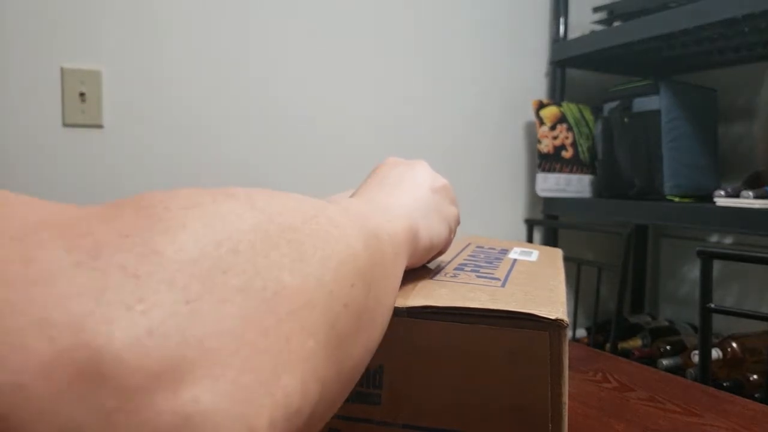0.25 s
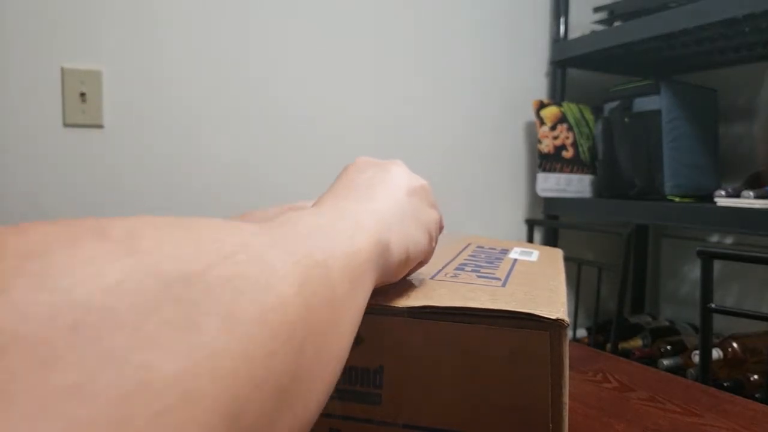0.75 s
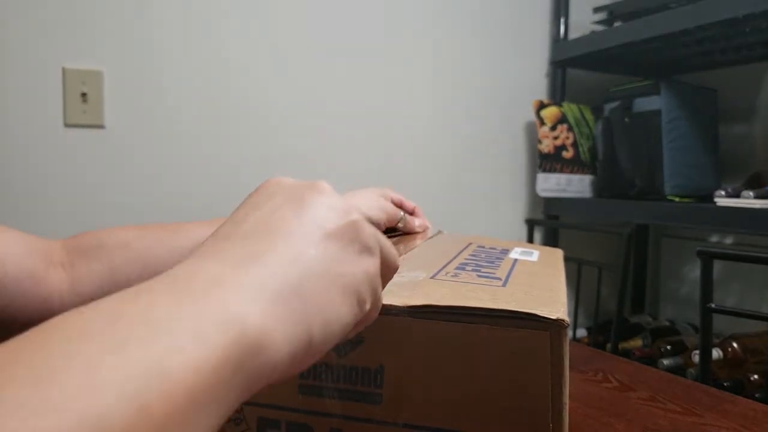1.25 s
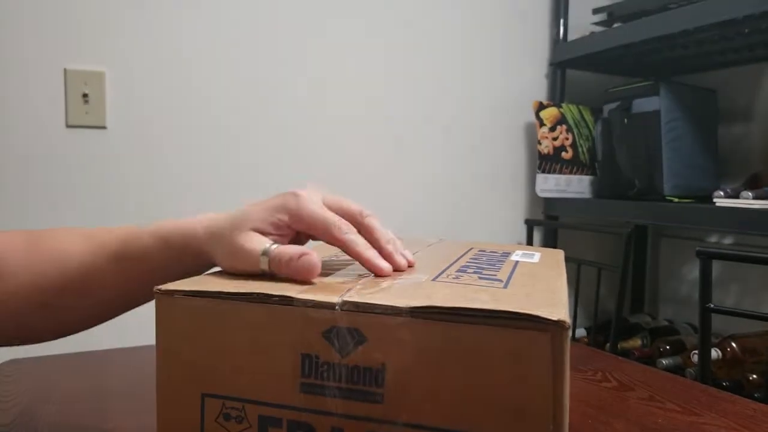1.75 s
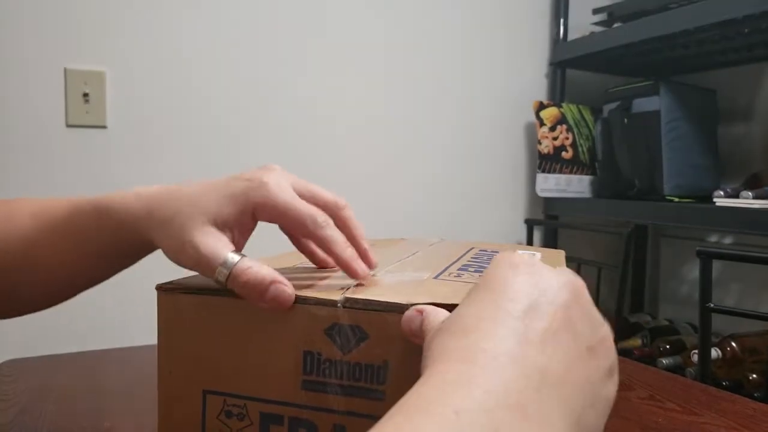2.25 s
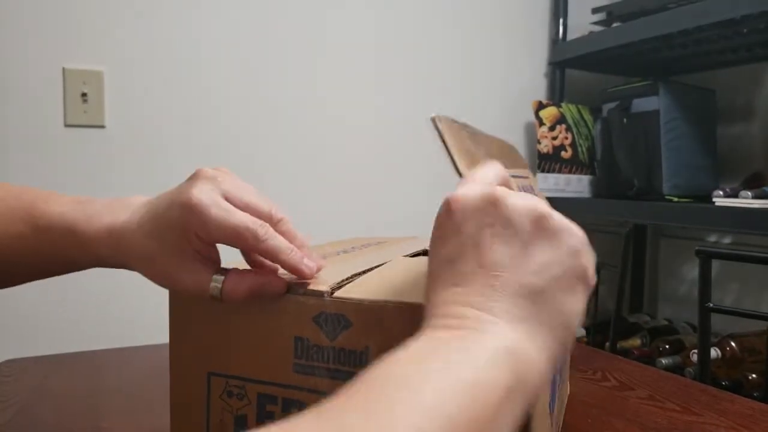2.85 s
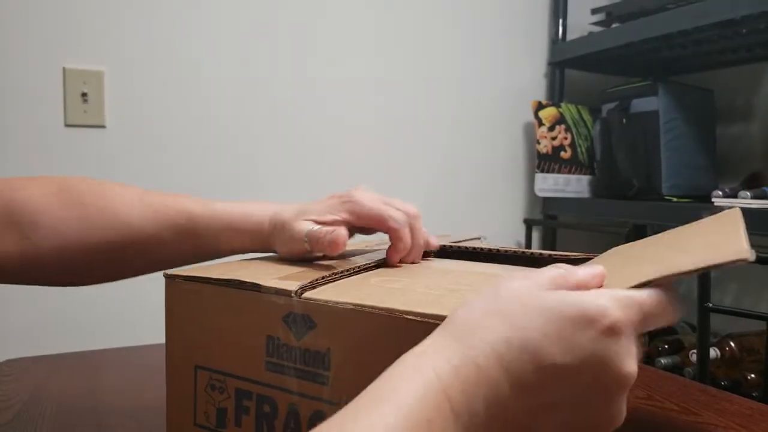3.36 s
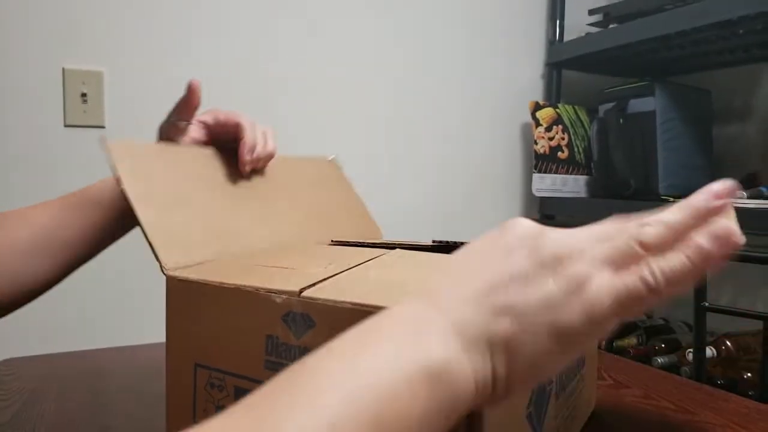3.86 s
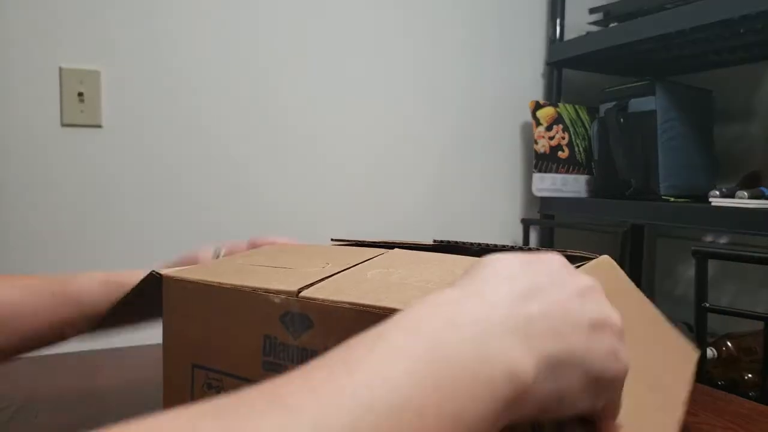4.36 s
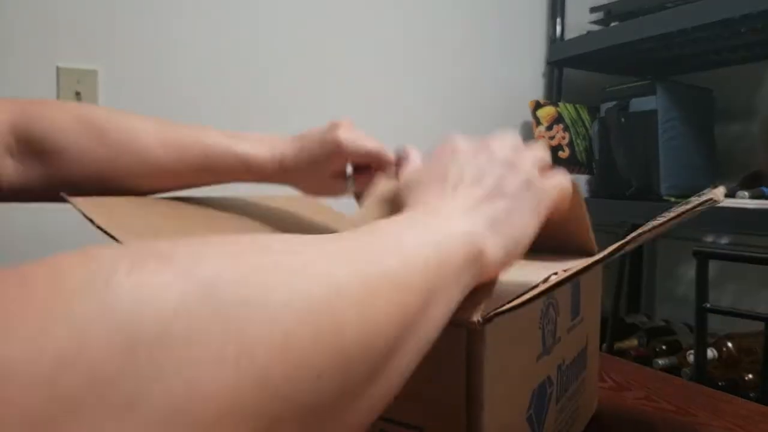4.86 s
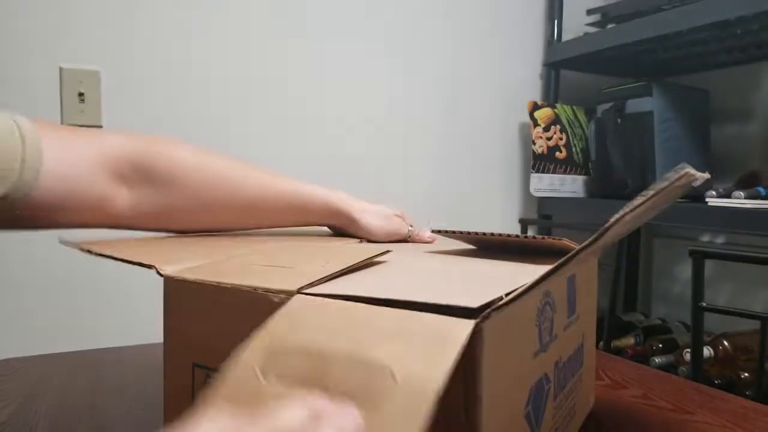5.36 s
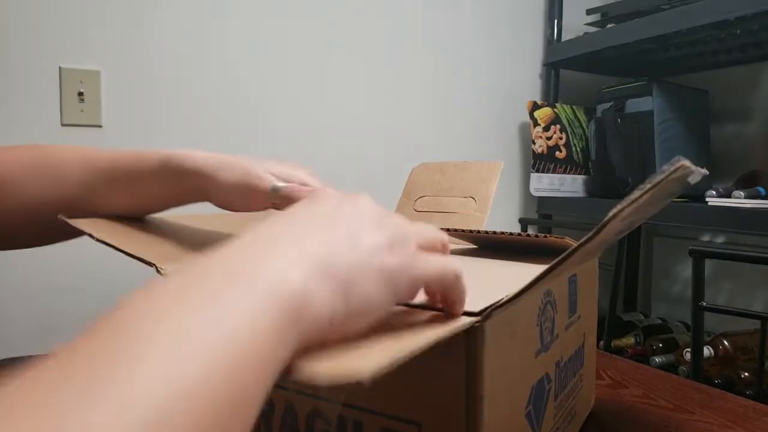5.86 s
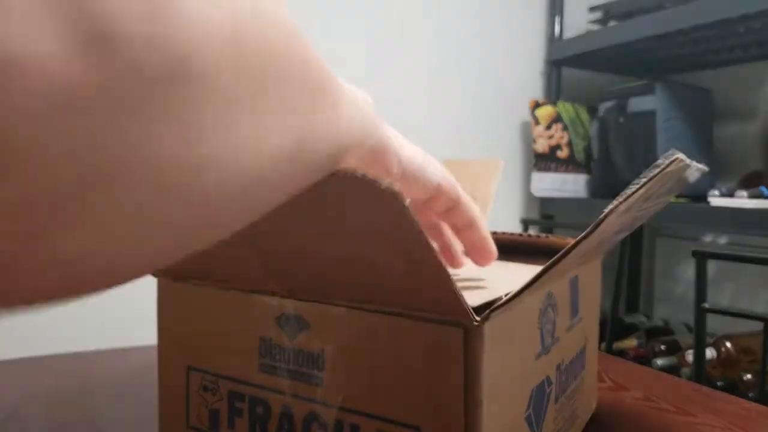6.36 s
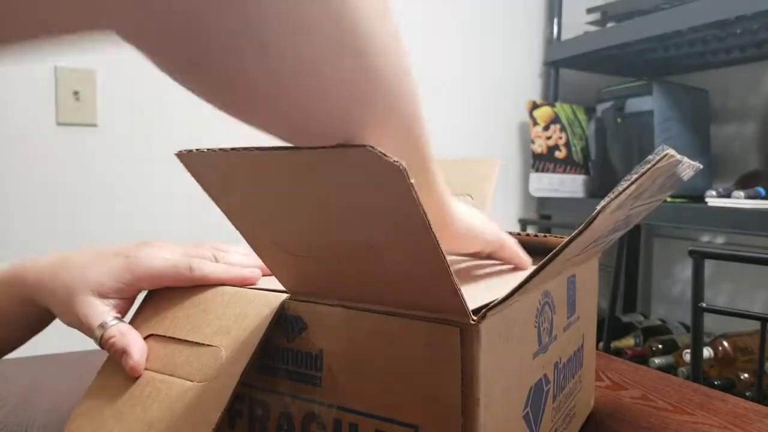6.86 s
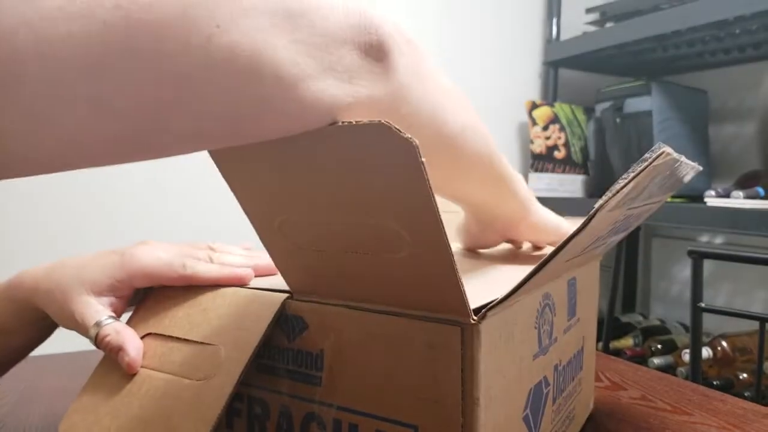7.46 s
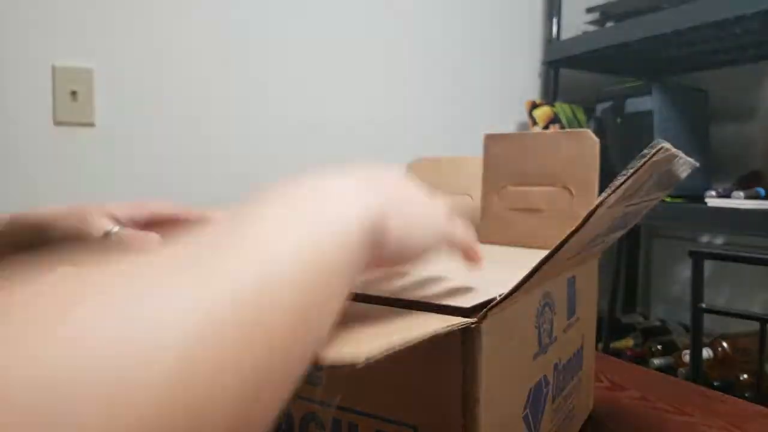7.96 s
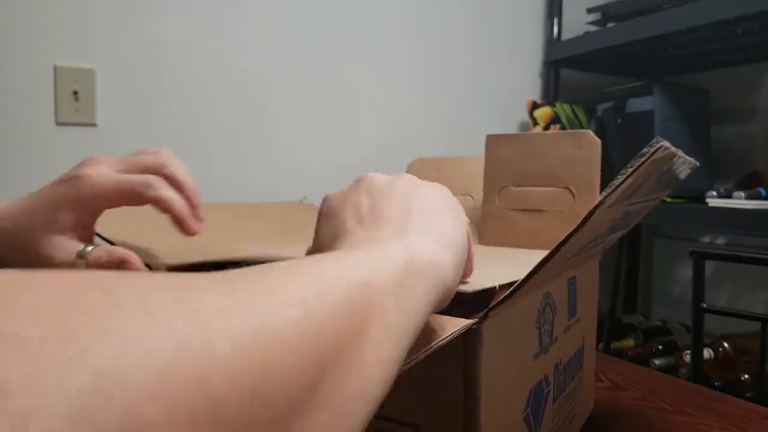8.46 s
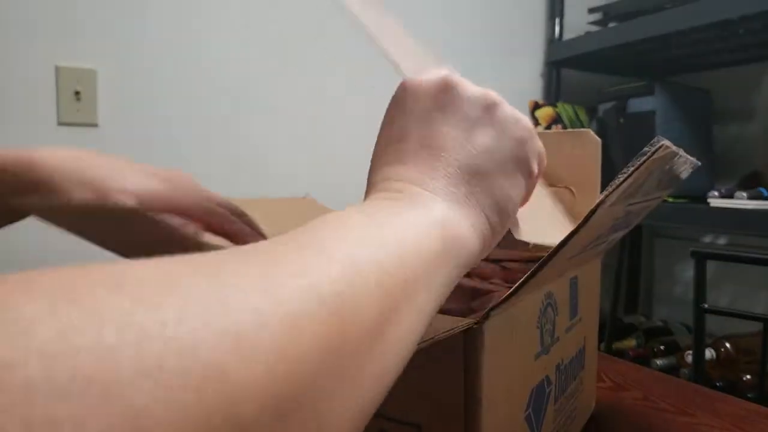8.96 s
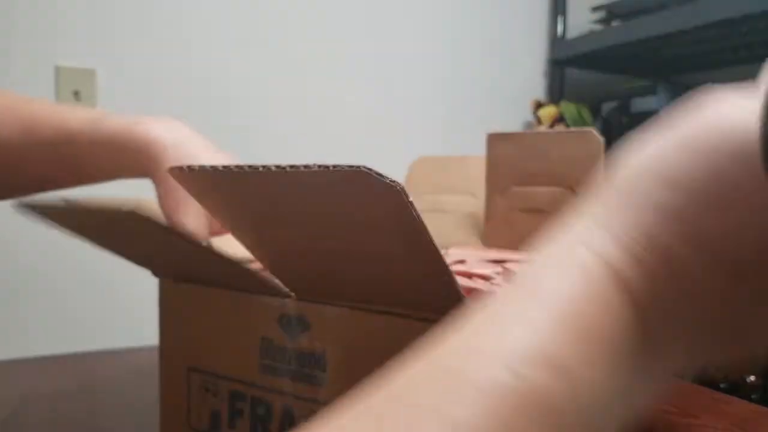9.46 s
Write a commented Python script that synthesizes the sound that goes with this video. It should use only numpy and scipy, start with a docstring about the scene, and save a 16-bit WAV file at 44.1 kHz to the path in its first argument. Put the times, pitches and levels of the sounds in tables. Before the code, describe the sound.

Close up in a small, quiet room with a low wavering hum, hands rub lightly over a cardboard box. A small metal blade drops on the table with a bright, brief, jingling ring. Two sharp pops follow as the last tape gives way and flaps come up, then fuller scraping, rustling, creaking flexes and dull hollow thumps continue to the end.

```python
"""Opening a cardboard box

A cardboard box is opened on a table in a small room, over a low wavering hum and filtered-noise room tone.
Hands, flaps and edges are swelling friction noise; scuffs and knocks ring flap, panel and box resonances.
After slitting the tape, a small steel blade is dropped on the table: ticks and ringing modes.
The last tape pops twice as the flaps are pulled up, in bursts of noise; then the handling carries on."""
import sys
import numpy as np
from scipy import signal
from scipy.fft import rfft, irfft, next_fast_len
from scipy.io import wavfile
from scipy.ndimage import uniform_filter1d

SR = 44100
rng = np.random.default_rng(int(sys.argv[2]) if len(sys.argv) > 2 else 0)


def wav_record(signal):
    """Record a signal, one row per channel, as 16-bit PCM in the file named by sys.argv[1]."""
    frames = np.transpose(np.atleast_2d(signal))
    bounded = np.clip(frames, -1, 1)
    # unit amplitude maps onto the largest positive 16-bit level
    quanta = np.round(bounded * 32767).astype(np.int16)
    wavfile.write(sys.argv[1], SR, quanta)


N = 427769


def amp(db):
    """Turns decibels into a gain factor."""
    return 10 ** (np.asarray(db) / 20)


def evened(x):
    """Scales to an rms of 1."""
    return x / np.sqrt(np.mean(x ** 2) + 1e-20)


def read(points, hz):
    """Reads a table on a log-frequency axis."""
    f, value = np.transpose(points)
    return np.interp(np.log(hz + 1), np.log(f + 1), value)


def add(mix, s, sound):
    """Mixes a stereo sound in at time s."""
    part = mix[:, max(round(s * SR), 0):][:, :sound.shape[1]]
    part += sound[:, :part.shape[1]]


def colour(x, spectrum, size=4096):
    """Causal (minimum-phase) filter with the given spectrum, so attacks stay sharp."""
    level_db = read(spectrum, abs(np.fft.fftfreq(size, 1 / SR)))
    log_gain = np.log(amp(np.maximum(level_db, -100)))
    kernel = np.fft.ifft(np.exp(np.conj(signal.hilbert(log_gain)))).real
    return signal.oaconvolve(x, kernel[None, :size // 2], axes=1)[:, :x.shape[1]]


# Stereo image of a diffuse sound: (frequency [Hz], left-right correlation [-1 to 1])
STEREO_LIKENESS = [(60, 0.94), (130, 0.95), (290, 0.88), (640, 0.69), (1410, 0.39), (3100, 0.086),
                   (6820, -0.0055), (15000, -0.048)]


def spread(pair):
    """Two unrelated signals become a diffuse field: alike in the bass, unrelated in the treble."""
    length = next_fast_len(pair.shape[1] + SR // 20)
    a, b = rfft(pair, length)
    same = np.clip(read(STEREO_LIKENESS, np.fft.rfftfreq(length, 1 / SR)), -1, 1)
    mid = a * np.sqrt((1 + same) / 2)
    side = b * np.sqrt((1 - same) / 2)
    return irfft(np.array([mid + side, mid - side]), length)[:, :pair.shape[1]]


def rumble(spectrum):
    """Smooth diffuse noise with the given spectrum."""
    length = next_fast_len(N)
    z = rfft(spread(rng.standard_normal((2, length))))
    gain = amp(read(spectrum, np.fft.rfftfreq(length, 1 / SR)))
    return evened(irfft(z * gain, length)[:, :N])


def friction(spectrum, slips_per_s, size_db, smooth, patchy_db, judder_db):
    """Makes tiny slips of uneven size over a smooth hiss; the contact judders and its colour shifts."""
    length = next_fast_len(N)
    slipping = rng.random(length) < slips_per_s / SR
    slips = amp(size_db * np.minimum(rng.exponential(1, length), 4)) * slipping
    judder = amp(judder_db * evened(uniform_filter1d(rng.standard_normal(length), size=260)))
    grain = np.sqrt(evened(slips) ** 2 + smooth ** 2) * judder
    pair = rng.standard_normal((2, length)) * grain
    _, _, z = signal.stft(spread(pair), SR, nperseg=1024)
    # blurring over frequency, then time, makes patches that brighten and dull
    patches = uniform_filter1d(rng.standard_normal(z.shape[1:]), size=7, axis=0)
    patches = evened(uniform_filter1d(patches, size=8, axis=1))
    moving = signal.istft(z * amp(patchy_db * patches), SR, nperseg=1024)[1][:, :N]
    return evened(colour(moving, spectrum))


def swells(gestures, shape):
    """Each gesture speeds up, peaks and slows down; gives the summed power of its two sounds."""
    t = np.arange(0, N / SR + .002, .001)
    power = np.zeros((2, len(t)))
    for s, rise, fall, *db in gestures:
        away = abs(t - s) / np.maximum(np.where(t < s, rise, fall), .005)
        power += (amp(db)[:, None] * np.exp(-away ** shape)) ** 2
    return [np.interp(np.arange(N) / SR, t, p) for p in power]


# The room's own noise: (frequency [Hz], relative level [dB])
ROOM_NOISE = [(13, -43.5), (22, 0.5), (128, 4), (229, -5), (672, -18.5), (1100, -30), (2080, -33.5),
              (3510, -30.5), (4380, -90), (7810, -60), (8970, -36.5), (12500, -29.5), (16000, -27.5)]
HUM_HZ = 125.3


def hum(waver_hz=1.1, throb=0.14, hum_db=-59.5, noise_db=-55.5):
    """A sine drifting in pitch and level hums over the room's own steady noise."""
    t, knots = np.arange(N) / SR, np.arange(0, 10, .125)
    drift = np.interp(t, knots, rng.standard_normal(len(knots)))
    swell = np.interp(t, knots, rng.standard_normal(len(knots)))
    tone = np.sqrt(2) * np.sin(2 * np.pi * np.cumsum(HUM_HZ + waver_hz * drift) / SR)
    return amp(hum_db) * tone * (1 + throb * swell) + amp(noise_db) * rumble(ROOM_NOISE)


# Skin sliding on board: (frequency [Hz], relative level [dB])
SKIN_SPECTRUM = [(2060, -16), (3500, -10), (4740, -13.5), (5800, -12), (7950, -13.5), (9130, -5),
                 (12300, -1.5), (15100, -2.5), (15800, -6)]
# Edges rasping: (frequency [Hz], relative level [dB])
EDGE_SPECTRUM = [(350, -21), (600, -3), (737, -12), (851, -9.5), (1080, -9.5), (1280, -7), (1880, -13.5),
                 (2040, -11), (2890, -11.5), (3480, -10.5), (4320, -18.5), (6250, -18), (7000, -18.5),
                 (9100, -55.5), (15400, -120)]
# Panels flexing: (frequency [Hz], relative level [dB])
FLEX_SPECTRUM = [(110, -36.5), (190, 1), (371, -2), (440, -2), (479, -9), (556, -12), (605, -12),
                 (740, -17.5), (900, -19.5), (1170, -45), (1980, -120)]
# The whole box swaying: (frequency [Hz], relative level [dB])
SWAY_SPECTRUM = [(13, -47.5), (22, -23), (54, 2.5), (92, -5), (110, -4), (124, 7.5), (156, -1),
                 (240, -11.5), (310, -21.5), (530, -120)]
# Strokes of a hand or flap over the board; swells() takes rise and fall as 5 ms or more:
# (fastest moment [s], speeding up [s], slowing down [s], skin hiss level [dB], edge rasp level [dB])
STROKES = [(0.065, 0.09, 0.052, -62, -76), (0.30, .16, .06, -56.5, -69), (0.338, 0.029, 0.039, -58, -63.5),
           (0.44, .012, 0.027, -60, -76), (0.614, 0.024, .11, -53, -63.5), (0.796, .085, .075, -60, -63.5),
           (0.93, 0.2, 0.038, -56, -72), (1.1, 0.1, 0.16, -67.5, -82), (1.278, 0.022, 0.038, -50, -58.5),
           (1.349, .041, 0.047, -51.5, -53.5), (1.507, .018, 0.033, -52, -57.5),
           (1.569, .023, 0.04, -42.5, -82), (1.72, 0.0043, .3, -55.5, -64), (2.137, .02, .03, -55, -70),
           (2.265, 0.027, .036, -51.5, -87), (2.337, .024, .09, -55.5, -80),
           (2.634, 0.074, 0.39, -54.5, -74), (2.922, 0.042, 0.084, -48.5, -64),
           (3.037, 0.015, 0.063, -58.5, -60), (3.195, 0.012, 0.36, -52, -67.5),
           (3.453, 0.043, .045, -43.5, -59), (3.515, 0.06, 0.064, -55, -53.5),
           (3.76, 0.14, 0.11, -57.5, -62.5), (3.966, 0.04, 0.066, -42, -61),
           (4.174, 0.036, 0.047, -51.5, -65), (4.296, 0.15, 0.045, -53.5, -58.5),
           (4.453, 0.019, 0.11, -58, -54.5), (4.621, 0.22, 0.14, -45, -60), (4.878, 0.062, 0.036, -48, -50),
           (4.962, 0.051, 0.11, -46.5, -54.5), (5.297, 0.2, .092, -48.5, -61.5),
           (5.392, 0.033, 0.085, -43, -67), (5.495, 0.027, .04, -43, -56),
           (5.769, 0.11, 0.52, -41.5, -52.5), (6.028, 0.047, 0.04, -37, -44.5),
           (6.185, 0.039, .07, -62, -64), (6.478, 0.11, .1, -42.5, -50), (6.702, .085, 0.041, -48, -55.5),
           (6.987, 0.25, .075, -43.5, -56.5), (7.296, 0.26, 0.15, -51, -61),
           (7.723, 0.067, 0.3, -49, -58.5), (7.966, 0.26, 0.37, -46, -56), (8.282, 0.029, 0.12, -46.5, -49),
           (8.581, 0.075, 0.11, -55, -51.5), (8.83, 0.13, 0.11, -56.5, -55.5),
           (8.993, 0.035, 0.064, -54, -51), (9.199, .022, 0.032, -51.5, -60),
           (9.343, 0.15, 0.045, -48.5, -52), (9.463, 0.073, 0.014, -47, -49.5),
           (9.613, .11, 0.096, -43.5, -45)]
# Shoves that shift the box:
# (hardest moment [s], building up [s], letting go [s], panel flex level [dB], box sway level [dB])
SHOVES = [(0.28, .25, .21, -60.5, -52), (0.635, .06, .07, -49.5, -49), (0.79, 0.097, 0.18, -50, -48),
          (1.34, 0.14, 0.23, -53, -47), (1.728, 0.01, 0.037, -46, -36.5), (1.81, 0.039, 0.054, -44.5, -54),
          (2.026, 0.021, 0.045, -56.5, -44.5), (2.18, .04, 0.092, -53, -61), (2.87, 0.15, .19, -54, -47),
          (3.187, 0.024, 0.13, -57, -52), (3.49, 0.092, 0.37, -54, -56), (3.988, .048, .055, -55, -45.5),
          (4.52, 0.094, 0.52, -57, -49), (4.833, 0.037, .055, -56, -43), (4.973, .026, 0.088, -57, -45),
          (5.386, .023, .06, -54, -46.5), (5.85, 0.058, 0.071, -53, -46.5),
          (6.03, 0.084, 0.081, -41.5, -41), (6.29, 0.062, 0.12, -46, -37.5),
          (6.465, 0.052, .14, -47.5, -43), (6.725, 0.064, 0.18, -55, -47.5),
          (7.2, 0.27, 0.29, -54.5, -46.5), (7.552, 0.046, 0.089, -60, -44.5),
          (7.665, .026, 0.23, -57, -41.5), (8.169, 0.11, 0.082, -49, -45), (8.32, 0.093, .15, -44.5, -40.5),
          (8.55, 0.09, .11, -49, -49), (8.793, .018, .08, -43.5, -48), (8.982, .1, 0.11, -63, -44.5),
          (9.127, .029, 0.14, -50.5, -46), (9.413, 0.044, 0.094, -50.5, -50.5),
          (9.69, 0.058, .06, -42.5, -38)]
STROKE_SHAPE, SHOVE_SHAPE = 1.6, 1.7  # 1 = a pointed swell, 2 = a rounded one
HOLD_HISS_DB, HOLD_FLEX_DB, HOLD_SWAY_DB = -68, -68.5, -61  # hands merely holding the box
DRAG_FLEX_DB, DRAG_SWAY_DB = -7.0, -7.5  # panels and box dragged along, relative to the edge rasp


def handling():
    """Skin hisses evenly, edges rasp coarsely, and shoved or dragged panels flex and sway."""
    slide, rasp = swells(STROKES, STROKE_SHAPE)
    flex, sway = swells(SHOVES, SHOVE_SHAPE)
    slide = slide + amp(HOLD_HISS_DB) ** 2
    flex = flex + amp(DRAG_FLEX_DB) ** 2 * rasp + amp(HOLD_FLEX_DB) ** 2
    sway = sway + amp(DRAG_SWAY_DB) ** 2 * rasp + amp(HOLD_SWAY_DB) ** 2
    skin = friction(SKIN_SPECTRUM, slips_per_s=5000, size_db=2.8, smooth=1.1, patchy_db=.8, judder_db=.6)
    edges = friction(EDGE_SPECTRUM, slips_per_s=1400, size_db=3.0, smooth=.8, patchy_db=3.0, judder_db=1.4)
    panels = friction(FLEX_SPECTRUM, slips_per_s=270, size_db=1.0, smooth=0.73, patchy_db=5.0, judder_db=1.0)
    rubbing = np.sqrt(slide) * skin + np.sqrt(rasp) * edges
    shifting = np.sqrt(flex) * panels + np.sqrt(sway) * rumble(SWAY_SPECTRUM)
    return rubbing + shifting


# Fibres giving way, for the crackles and the snaps: (frequency [Hz], relative level [dB])
CRACK_SPECTRUM = [(260, -16), (450, -3.5), (818, -18), (1050, -16), (2290, -16), (2660, -18.5),
                  (3590, -15.5), (5710, -24), (7930, -22.5), (9070, -16), (9770, -21), (12600, -19),
                  (16000, -26)]


def crackles(level_db, per_s=22, size_db=7.0, crack_s=0.0012):
    """Now and then a rasping edge snags a fibre, which gives way with a tiny crack."""
    _, rasp = swells(STROKES, STROKE_SHAPE)
    snagging = rng.random(N) < per_s / SR
    snags = amp(size_db * np.minimum(rng.exponential(1, N), 3)) * snagging
    t = np.arange(SR // 50) / SR
    fading = signal.oaconvolve(snags, np.exp(-t / crack_s))[:N]
    cracks = colour(spread(rng.standard_normal((2, N)) * fading), CRACK_SPECTRUM)
    return amp(level_db) * np.sqrt(rasp) * evened(cracks)


# Blows on the box: (time [s], level [dB], pitch of the struck panel [Hz])
KNOCKS = [(0.19, -38.5, 127), (0.33, -40, 346), (0.783, -34.5, 333), (1.264, -38, 140), (1.28, -30, 318),
          (1.356, -33.5, 114), (1.462, -39, 117), (1.714, -36, 94), (2.338, -39, 135), (2.76, -17, 132),
          (2.7845, -16, 394), (3.5915, -7, 348), (3.598, -28, 118), (3.981, -37, 141), (4.271, -40, 332),
          (4.642, -36.5, 110), (4.833, -41.5, 323), (4.945, -32.5, 201), (5.374, -34.5, 170),
          (5.931, -31, 210), (6.004, -30, 295), (6.246, -28, 130), (6.273, -37, 130), (6.321, -26, 232),
          (6.442, -25.5, 91), (6.617, -34, 123), (6.954, -32.5, 131), (7.171, -32, 125),
          (7.186, -28.5, 127), (7.224, -33.5, 312), (8.327, -27.5, 144), (8.43, -31, 129),
          (8.976, -25.5, 172), (9.182, -33, 178), (9.593, -34.5, 174), (9.664, -33.5, 296)]
# Modes of the hollow box: (frequency [Hz], relative level [dB], decay by 60 dB [s])
BOX_MODES = [(122.9, -15, 0.33), (176, -45, 0.22), (240, -20, 0.087), (333, -35.5, 0.13), (364, -36, 0.14),
             (415, -23, 0.27), (535, -54.5, .14), (605, -18.5, 0.094), (665, -26.5, .14), (863, -36, 0.14),
             (980, -26.5, 0.11), (1430, -22.5, 0.08)]


def knocks(swing_s=0.0029, swing_cycles=0.2, wall_s=0.0103, wall_db=-12.0):
    """A struck panel swings briefly and sets the hollow box ringing; the near wall answers."""
    out, t = np.zeros((2, N)), np.arange(SR // 3) / SR
    for s, db, hz in KNOCKS:
        u = t / (swing_s / 2 + swing_cycles / hz)
        panel = -u * np.exp(1 - u) * np.sin(2 * np.pi * hz * t)
        ring = np.zeros(len(t))
        for f, level, t60 in BOX_MODES:
            reach = 1 / (1 + (f / (3 * hz)) ** 4)  # a slow blow hardly reaches the higher modes
            ring -= amp(level - 60 * t / t60) * np.sin(2 * np.pi * f * t) * reach
        blow = amp(db) * np.tile(panel + ring * (1 - np.exp(-u)), (2, 1))
        add(out, s, blow)
        add(out, s + wall_s, amp(wall_db) * blow)
    return out


# Tape and board snapping; the level is before the snaps' common trim, and a length over 20 ms plays as 20 ms:
# (time [s], peak level [dB], treble boost or cut [dB], length [s])
SNAPS = [(0.584, -46, 33, 0.0014), (1.273, -46, 14, 0.0087), (1.322, -41.5, 2, 0.0076),
         (1.344, -45, -2, 0.0063), (1.392, -42.5, -3, 0.0026), (2.135, -47, 17.5, 0.0061),
         (2.63, -51, 8, 0.018), (2.737, -43.5, 11, .024), (2.758, -23.5, -2, 0.0033),
         (2.763, -33, -11, .017), (2.779, -34, 8, 0.025), (3.118, -47.5, -3, 0.0044),
         (3.567, -52, -10, 0.0081), (3.5904, -18.5, 4, 0.0018), (3.6, -32, -15, 0.0032),
         (4.833, -39.5, -16, 0.0063), (4.844, -34, 8.5, 0.013), (4.855, -39, 16, .012),
         (4.946, -34, 4.5, 0.0094), (5.375, -40.5, 10, .0063), (6.034, -36.5, 10, 0.021),
         (6.318, -40.5, -4, 0.0097), (6.321, -28.5, 5, 0.0019), (6.329, -36.5, -3, 0.0068),
         (6.437, -36, 2, 0.0055), (6.634, -40, 7, 0.0016), (6.769, -27, 14.5, 0.0028),
         (7.21, -49, -11, .011), (7.221, -39, -3, 0.0086), (7.234, -45, 3, 0.0083),
         (7.722, -50.5, 2, 0.0044), (8.329, -46.5, -5, 0.01), (8.508, -45, 14, .003),
         (8.831, -43, -4, 0.0056), (8.963, -50, -6, .0044), (9.62, -35, -36, .011), (9.675, -48, 9, .012)]


def snaps(trim_db=2.5, tail_db=-38.0, tail_s=0.02, grain_db=4.5):
    """Each snap is a burst of fibres giving way, with a faint buzz of the board after it."""
    out, t = np.zeros((2, N)), np.arange(SR // 8) / SR
    crisp_band = signal.butter(2, 800, "high", fs=SR, output="sos")
    for s, db, bright_db, length in SNAPS:
        fibres = amp(grain_db * evened(uniform_filter1d(rng.standard_normal(len(t)), size=25)))
        fading = np.exp(-t / np.clip(length, .0005, .02)) + amp(tail_db) * np.exp(-t / tail_s)
        burst = spread(rng.standard_normal((2, len(t))) * fibres * fading)
        # the treble tilt sets in at 3 kHz and is complete two octaves up
        tilted = [(hz, level + bright_db * np.clip(np.log2(hz / 3000) / 2, 0, 1))
                  for hz, level in CRACK_SPECTRUM]
        snap = colour(burst, tilted)
        # levelled by its loudest 2 ms above 800 Hz
        crisp = signal.sosfilt(crisp_band, snap)
        loudest = np.sqrt(uniform_filter1d((crisp ** 2).mean(0), size=88).max())
        add(out, s, amp(db + trim_db) * snap / loudest)
    return out


# An edge catching and chattering; the level is before the scuffs' common trim:
# (middle [s], level [dB], resonance [Hz], length [s])
SCUFFS = [(0.796, -63, 1520, 0.13), (1.399, -55.5, 1470, 0.031), (1.763, -55.5, 2420, 0.047),
          (4.462, -51, 683, 0.06), (4.469, -59, 1890, 0.063), (4.543, -58, 1280, 0.15),
          (4.576, -53.5, 600, 0.06), (5.274, -61.5, 1270, 0.044), (5.759, -55, 670, 0.094),
          (6.02, -48, 1320, 0.1), (6.021, -38.5, 432, 0.068), (6.929, -62, 1390, 0.42),
          (7.099, -54.5, 1260, 0.024), (7.22, -53, 1370, 0.041), (7.955, -62, 1290, 0.23),
          (8.341, -58, 1300, 0.028), (8.808, -58, 590, 0.051), (9.332, -49.5, 500, 0.039),
          (9.617, -47.5, 1440, .03), (9.673, -40.5, 480, 0.037)]


def scuffs(trim_db=-3.5, width=0.11, slips_per_s=400):
    """A quick run of slips rings one resonance of a flap."""
    out, t = np.zeros((2, N)), np.arange(SR // 40) / SR
    for s, db, hz, length in SCUFFS:
        count = int(SR * length)
        slips = (rng.random(count) < slips_per_s / SR) + 0.04 * rng.standard_normal((2, count))
        ring = np.exp(-np.pi * width * hz * t) * np.sin(2 * np.pi * hz * t)
        chatter = signal.oaconvolve(np.diff(slips) * np.hanning(count - 1), ring[None], axes=1)
        add(out, s - length / 2, amp(db + trim_db) * evened(chatter))
    return out


# The blade touching the table: (time [s], ring level [dB], tick level [dB])
CLATTER = [(1.715, -57, -63), (1.7503, -42, -41.5), (1.797, -27.5, -28.5), (1.8105, -14, -31),
           (1.815, -13.5, -24), (1.826, -18.5, -36.5), (1.84, -12.5, -37.5), (1.848, -20.5, -43),
           (1.855, -23, -33.5), (1.866, -20.5, -40), (1.887, -42.5, -38.5), (1.9, -15, -38.5),
           (1.908, -21.5, -35), (1.917, -32, -40.5), (1.978, -33, -58), (2.011, -41, -49), (2.04, -41, -53)]
# The blade's modes: (frequency [Hz], relative level [dB])
BLADE_MODES = [(2560, -34.5), (3310, -33), (3720, -34.5), (5080, -41.5), (5930, -41.5), (6788, -33),
               (8856, -16.5), (9945, -9.5), (10663, -24), (10819, 0), (11007, -22.5), (11563, -16),
               (11622, -10), (11656, -6), (14339, -4), (14681, -8.5), (15581, -8)]
# The tick of steel on the table: (frequency [Hz], relative level [dB])
TICK_SPECTRUM = [(500, -1), (1700, -3), (2500, 1.5), (3400, 5.5), (4400, -2.5), (5300, 0), (6800, -0.5),
                 (8000, -24.5), (11000, -2), (16000, -18.5)]
BLADE_DAMPED_S = 1.908  # from here the ringing is quickly damped, though a few faint touches follow


def blade(ring_s=0.24, tick_s=.0035, damping_s=.008):
    """Every touch on the table ticks and rings the steel's modes in a new mix; late on, the ring is damped."""
    out, t = np.zeros((2, N)), np.arange(SR // 4) / SR
    hz, mode_db = np.transpose(BLADE_MODES)
    waves = np.exp(2j * np.pi * hz[:, None] * t)
    for s, ring_db, tick_db in CLATTER:
        share = amp(mode_db) * np.sqrt(rng.exponential(1, (2, len(hz))) + .3)
        share = share / np.linalg.norm(share, axis=1, keepdims=True)
        share = share * np.exp(2j * np.pi * rng.random(share.shape))  # random phases
        time_damped = np.maximum(t - max(BLADE_DAMPED_S - s, 0), 0)
        ring = (share @ waves).real * amp(-60 * t / ring_s) * np.exp(-time_damped / damping_s)
        tick = evened(colour(rng.standard_normal((2, len(t))), TICK_SPECTRUM)) * np.exp(-t / tick_s)
        add(out, s, amp(ring_db) * ring + amp(tick_db) * tick)
    return out


# The small room's reverberation: (frequency [Hz], decay by 60 dB [s])
ROOM_DECAY = [(100, 0.19), (400, 0.27), (1500, 0.39), (5000, .36), (15000, 0.19)]


def room(x, wet_db, build_s=0.0029):
    """Adds the small room's echoes as a decaying noise tail, each band dying at its own speed."""
    hz, t, z = signal.stft(spread(rng.standard_normal((2, SR // 2))), SR, nperseg=256)
    decay = amp(-60 * t / read(ROOM_DECAY, hz)[:, None])
    tail = signal.istft(z * decay, SR, nperseg=256)[1]
    tail *= 1 - np.exp(-(np.arange(tail.shape[1]) / SR / build_s) ** 2)
    echoes = signal.oaconvolve(x, tail / np.linalg.norm(tail[0]), axes=1)[:, :N]
    return x + amp(wet_db) * echoes


def scene():
    """Rubbing and hum, with the snaps, crackles, scuffs, knocks and the blade echoing in the room."""
    clatter = room(blade(), wet_db=-9.0)
    cracks = room(snaps() + crackles(level_db=-8.0), wet_db=-8.5)
    scuffing = room(scuffs(), wet_db=-3.5)
    knocking = room(knocks(), wet_db=-5.0)
    return handling() + hum() + cracks + scuffing + knocking + clatter


# Where the noise suppressor works: (frequency [Hz], share of the signal [0 to 1])
HUSH_BAND = [(3500, 0.096), (4300, 0.35), (8000, 0), (9500, 0)]


def suppress(x, below_db=-77.0, deepest_db=-7.0):
    """A noise suppressor turns the upper mids down whenever they grow faint."""
    length = next_fast_len(N + 2048)
    share = np.clip(read(HUSH_BAND, np.fft.rfftfreq(length, 1 / SR)), 0, 1)
    band = irfft(rfft(x, length) * share, length)[:, :N]
    power = abs(uniform_filter1d((band ** 2).mean(0), size=900))  # over about 20 ms
    gain = np.maximum(power / (power + amp(below_db) ** 2), amp(deepest_db))
    return x - (1 - gain) * band


# Balance of the two microphones: (frequency [Hz], left minus right level [dB])
STEREO_LEAN = [(60, 0.5), (110, 1), (200, -0.5), (380, -0.5), (700, 2), (1290, -1), (2380, -4), (4400, -5),
               (8120, 0.5), (15000, -13)]


def record(dry, edge_hz=15950):
    """The right microphone hears more of most treble; then noise suppression and the band limit."""
    length = next_fast_len(N + 2048)
    lean = amp(read(STEREO_LEAN, np.fft.rfftfreq(length, 1 / SR)) / 2)
    # both gains together keep the same summed power at every frequency
    sides = np.array([lean, 1 / lean]) / np.sqrt((lean ** 2 + lean ** -2) / 2)
    heard = suppress(irfft(rfft(dry, length) * sides, length)[:, :N])
    low_pass = signal.firwin(255, edge_hz, window=("kaiser", 8), fs=SR)
    return signal.oaconvolve(heard, low_pass[None], "same")


dry = scene()
out = record(dry)
wav_record(out)
```